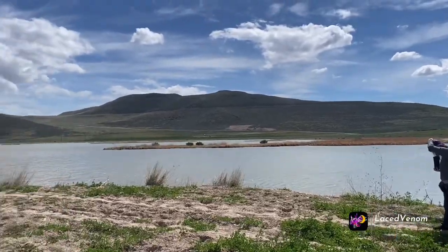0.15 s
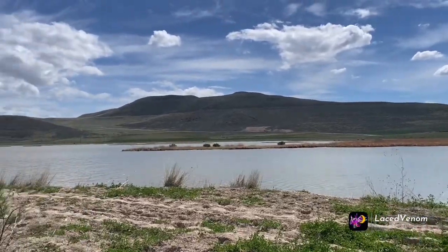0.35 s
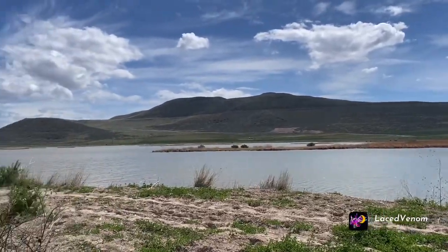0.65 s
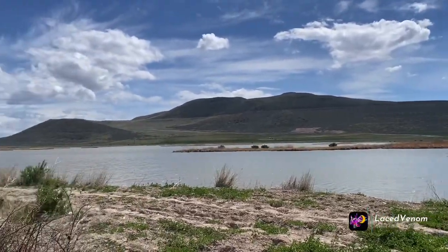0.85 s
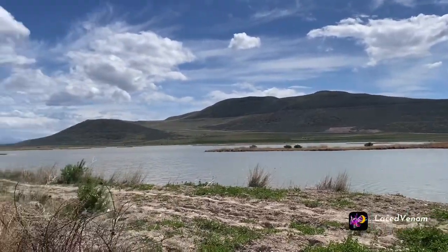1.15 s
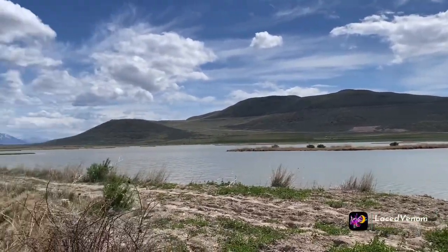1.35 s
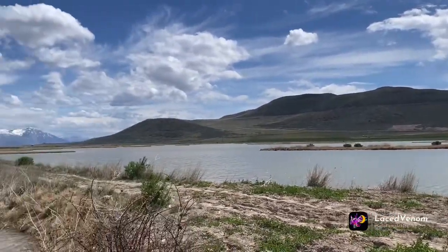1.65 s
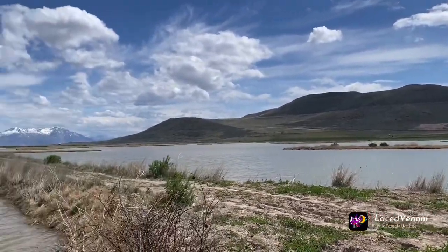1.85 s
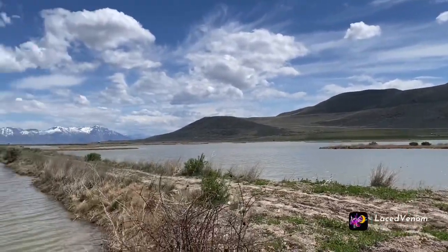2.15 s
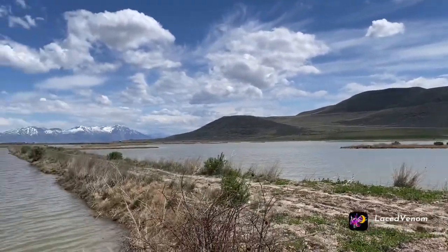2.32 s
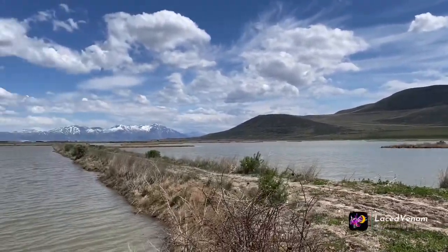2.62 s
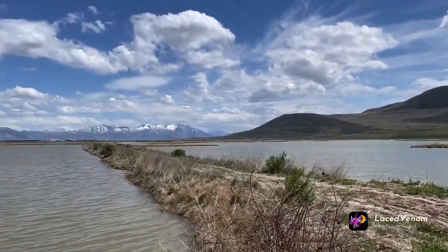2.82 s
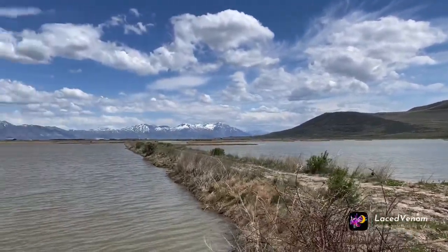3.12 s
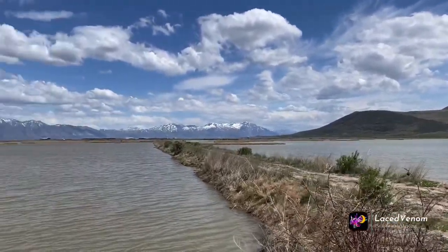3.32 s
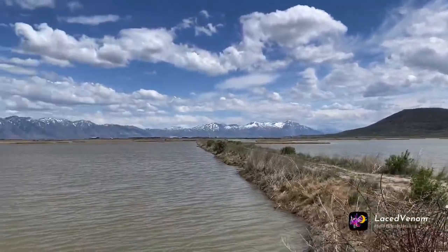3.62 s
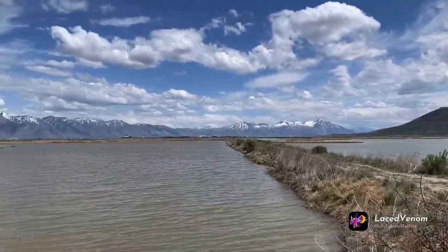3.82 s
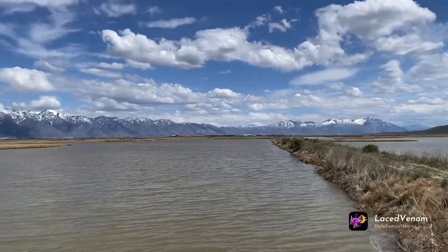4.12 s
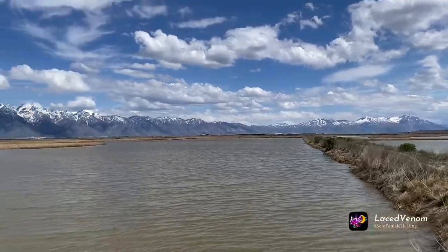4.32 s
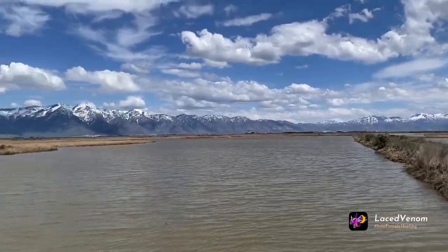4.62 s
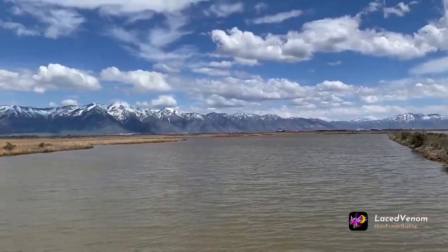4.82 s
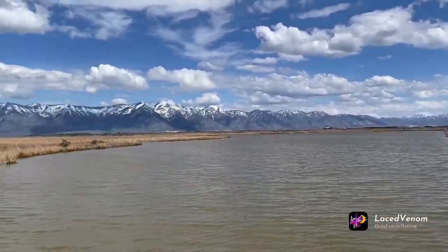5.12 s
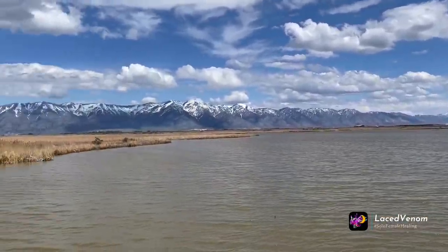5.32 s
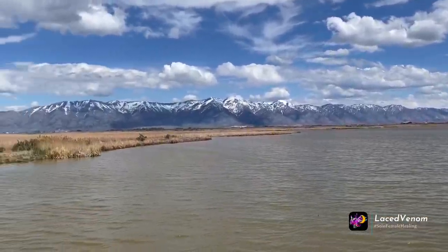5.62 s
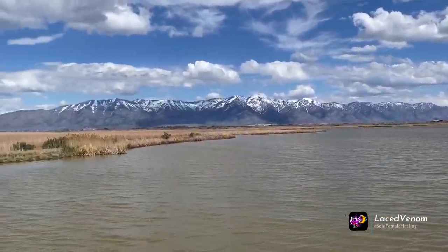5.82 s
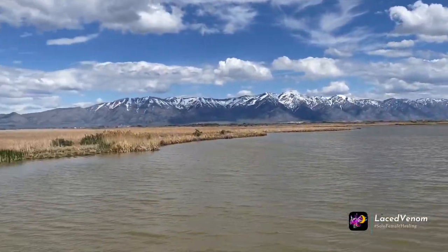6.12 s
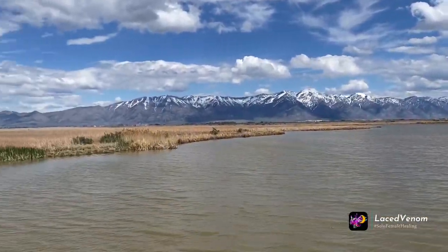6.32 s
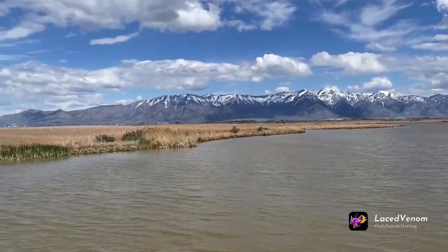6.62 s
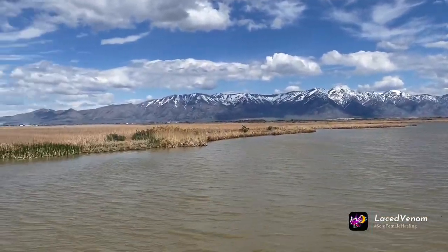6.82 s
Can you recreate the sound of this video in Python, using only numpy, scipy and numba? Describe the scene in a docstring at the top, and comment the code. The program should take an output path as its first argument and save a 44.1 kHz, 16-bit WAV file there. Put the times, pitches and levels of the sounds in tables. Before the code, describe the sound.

Outdoors by a lake, water runs steadily through a concrete box, a soft bubbly rush with gulps, bright plinks and tiny spray ticks, close and with a very short hard-walled echo. Deep wind thumps hit the hand-held microphone, light at first, strongest around one and a half and three seconds, then coming irregularly. Faint hiss lies underneath.

```python
"""Wind buffets a hand-held microphone, over water rushing through a concrete box by a lake.
Wind pushes the diaphragm with lumpy pressure swings: shaped noise, plus a single swing for each thump.
The flow is flickering noise with swarms of bubbles; trapped air rings as sines with short, swelling attacks.
Big bubbles gulp and rise in pitch, small ones plink near 2 kHz, and spray ticks on top;
the close walls answer these single splashes with a short tail of echoes. The microphone hisses faintly."""
import sys
import numpy as np
from scipy import signal
from scipy.fft import rfft, irfft, next_fast_len
from scipy.io import wavfile
from scipy.ndimage import uniform_filter1d
from numba import njit

SR = 44100
rng = np.random.default_rng(int(sys.argv[2]) if len(sys.argv) > 2 else 0)


def generate_wav(sig):
    """Save sig (samples, or channels by samples) to the path in sys.argv[1] as 16-bit PCM at SR."""
    pcm = np.round(np.clip(np.atleast_2d(sig).T, -1, 1) * 32767).astype(np.int16)
    wavfile.write(sys.argv[1], SR, pcm)


N = 306915


def from_db(db):
    """Decibels to gain."""
    return 10 ** (np.asarray(db) / 20)


def rms_one(x):
    """Scale to rms 1."""
    return x / np.sqrt(np.mean(x ** 2) + 1e-20)


def in_time(rows):
    """Draw straight lines through the columns of a curve table, one value a sample."""
    s, *columns = np.transpose(rows)
    return [np.interp(np.arange(N) / SR, s, column) for column in columns]


def drift(corner_hz):
    """Slow chance: coarse noise through two equal one-pole low-passes, run in; rms 1."""
    step = 40   # samples between coarse values
    pole = np.exp(-2 * np.pi * corner_hz * step / SR)
    noise = rng.standard_normal(N // step + 2002)
    slow = signal.lfilter([1], [1, -2 * pole, pole * pole], noise)[2000:]
    return np.interp(np.arange(N) / step, np.arange(len(slow)), rms_one(slow))


def coloured(spectrum, patchy_db, flicker_hz, count):
    """Noise of a given colour, cut into overlapping bands that each flicker on their own; rms 1."""
    size = next_fast_len(N)
    log_hz = np.log(np.arange(1, size // 2 + 2) * SR / size)
    hz, level_db = np.transpose(spectrum)
    corners = np.log(hz)
    colour_db = np.interp(log_hz, corners, level_db, left=-200, right=-200)
    shaped = rfft(rng.standard_normal(size)) * from_db(colour_db)
    place = (log_hz - corners[0]) / (corners[-1] - corners[0]) * (count - 1)
    total = np.zeros(N)
    for k in range(count):
        band = irfft(shaped * np.clip(1 - abs(place - k), 0, 1), size)[:N]
        total += band * from_db(patchy_db * drift(flicker_hz))
    return rms_one(total)


def swells(times, levels_db, half_s):
    """Short bell-shaped swells at the given times, as gain."""
    out, t = np.zeros(N), np.arange(N) / SR
    for s, db in zip(times, levels_db):
        near = slice(max(int((s - 3 * half_s) * SR), 0), int((s + 3 * half_s) * SR))
        out[near] += from_db(db) * np.exp(-((t[near] - s) / half_s) ** 2)
    return out


def evened(x, window_s):
    """Divide out most of the noise's own slow swells, so that the gusts lead the level."""
    width = int(window_s * SR)
    power = uniform_filter1d(uniform_filter1d(x ** 2, width), width)
    return rms_one(x / np.sqrt(power + 0.035))


def sucks(times, levels_db, hz):
    """A passing eddy pulls the diaphragm out once, with a small push before and after."""
    half_cycles = 0.6   # half length of the bell around the swing
    out, t = np.zeros(N), np.arange(N) / SR
    for s, db in zip(times, levels_db):
        near = slice(max(int((s - 2 / hz) * SR), 0), int((s + 2 / hz) * SR))
        turns = (t[near] - s) * hz
        out[near] -= from_db(db) * np.exp(-(turns / half_cycles) ** 2) * np.cos(2 * np.pi * turns)
    return out


def wind():
    """Pressure swings of eddies passing the microphone, from large slow ones down to small ones that rustle."""
    # Wind strength. Each row: time in seconds, large eddies in dB, small eddies in dB.
    gusts = [(0.0, -35.5, -37.5), (0.04, -35.5, -54.5), (0.29, -38, -54.5), (0.48, -34.5, -58),
             (1.01, -33.5, -48), (1.26, -31.5, -50.5), (1.57, -22.5, -45), (2.17, -27, -43.5),
             (2.21, -23, -40.5), (2.64, -28, -47.5), (2.79, -24.5, -42.5), (3.31, -29, -45),
             (4.55, -28, -42), (4.77, -40.5, -48), (5.0, -33.5, -49), (5.18, -30, -43.5), (5.64, -34, -46),
             (6.07, -36.5, -46), (6.24, -32.5, -52.5), (6.4, -28, -41.5), (6.55, -34, -47),
             (6.96, -32, -44)]
    # Single eddies that thump the diaphragm. Each row: centre in seconds, slow push peak in dB,
    # buffeting peak in dB, flutter swell in dB.
    thump_rows = [(0.226, -16.5, -47, -48), (0.349, -27.5, -54, -57), (.45, -22, -53, -40.5),
                  (1.048, -14.5, -41, -63), (1.421, -7, -29, -32), (1.589, -34, -21, -66),
                  (1.66, -11, -29, -42), (1.801, -35, -21, -29.5), (1.879, -24, -34, -36.5),
                  (1.98, -14.5, -20, -33), (2.07, -43, -43, -39), (2.255, -13, -9.5, -33),
                  (2.722, -10, -16.5, -57), (2.912, -19, -44, -61), (3.044, -17, -22, -39),
                  (3.152, -6.5, -36, -44), (3.2, -9, -37, -47), (3.278, -20, -12, -51),
                  (3.551, -26, -45, -37), (3.619, -14, -29, -63), (3.92, -11, -49, -53),
                  (4.36, -48, -18, -38), (4.587, -12.5, -26, -36), (5.12, -53, -43, -52),
                  (5.369, -35, -22.5, -39), (5.579, -37, -28, -47), (5.999, -18, -26, -47),
                  (6.38, -46, -38, -37.5), (6.53, -22, -46, -35), (6.888, -37, -22, -39)]
    # Colours of the eddies, largest first. Each row: frequency in Hz, relative level in dB per Hz.
    push_colour = [(1.2, -52), (2.0, 0), (24, -2.5), (31, -49), (53, -120)]
    buffet_colour = [(14, -58), (24, -2), (35, -9.5), (60, -17.5), (78, -59), (130, -120)]
    flutter_colour = [(35, -46), (60, -0.5), (130, -15), (170, -84), (290, -120)]
    rustle_colour = [(76, -30), (130, -0.5), (320, -10), (420, -20), (700, -120)]
    push_over_db, push_follows = 5, 0.62   # lift over the large eddies' mean; share of their swing
    flutter_lift_db, large_share = 1, 0.39   # lift over a blend of both strengths; the large eddies' share
    lumpy_db, lump_hz = -0.5, 2.6   # chance swells of each eddy size
    shared_db, shared_hz = 0.5, 24.5   # quick swells that all eddies share

    large_db, small_db = in_time(gusts)
    s, push_peak_db, buffet_peak_db, flutter_peak_db = np.transpose(thump_rows)
    mean_db = large_db.mean()
    slow_db = mean_db + push_over_db + push_follows * (large_db - mean_db)
    mid_db = flutter_lift_db + large_share * large_db + (1 - large_share) * small_db
    push_gain = from_db(slow_db + lumpy_db * drift(lump_hz))
    buffet_gain = from_db(large_db + lumpy_db * drift(lump_hz))
    flutter_gain = from_db(mid_db + lumpy_db * drift(lump_hz)) + swells(s, flutter_peak_db, half_s=0.019)

    thumps = sucks(s, push_peak_db, hz=14.4) + sucks(s, buffet_peak_db, hz=36.7)
    push = push_gain * evened(coloured(push_colour, 0, 1, count=2), window_s=0.12)
    buffet = buffet_gain * evened(coloured(buffet_colour, 0, 1, count=2), window_s=0.17)
    flutter = flutter_gain * evened(coloured(flutter_colour, 0.47, 44, count=2), window_s=0.35)
    rustle = from_db(small_db) * evened(coloured(rustle_colour, 0.43, 13.0, count=3), window_s=0.25)
    shared = from_db(shared_db * drift(shared_hz))
    return thumps + shared * (push + buffet + flutter + rustle)


@njit
def add(out, starts, peaks, pitches_hz, t60s, rise, attack_cycles, rate):
    """Each bubble is a sine that swells in, dies away and climbs by rise octaves a second."""
    for k in range(len(starts)):
        tone = np.zeros(int(.8 * t60s[k] * rate + 80))
        climb, fade = 2 ** (rise / rate), 1000 ** (-1 / (t60s[k] * rate))
        fill = np.exp(-pitches_hz[k] / (attack_cycles * rate))
        hz, left, empty, turns, top = pitches_hz[k], 1., 1., 0., 0.
        for i in range(len(tone)):
            shape = (1 - empty) ** 2 * left
            turns += min(hz / rate, .45)   # stay below half the sample rate
            tone[i], top = shape * np.sin(2 * np.pi * turns), max(top, shape)
            hz, left, empty = hz * climb, left * fade, empty * fill
        start = int(starts[k] * rate)
        out[start:start + len(tone)] += peaks[k] / top * tone[:len(out) - start]


def bubbles(s, peak_db, hz, t60, rise, attack_cycles):
    """A track holding one ringing bubble for each given time."""
    out, one = np.zeros(N), np.ones(len(s))
    add(out, s * one, from_db(peak_db) * one, hz * one, t60 * one, float(rise), float(attack_cycles), float(SR))
    return out


def swarm(per_s, low_hz, high_hz, cycles, spread_db, tilt_db, rise, clump_db, attack_cycles):
    """Countless unseen bubbles born in clumps, with uneven sizes and pitches; rms 1."""
    chance = per_s * from_db(clump_db * drift(9)) / SR   # of a birth at each sample
    born = np.flatnonzero(rng.random(N) < chance)
    size, place = rng.random((N, 2))[born].T
    hz = low_hz * (high_hz / low_hz) ** place
    peak_db = -spread_db * np.log(size + 0.022) + tilt_db * place
    return rms_one(bubbles(born / SR, peak_db, hz, cycles / hz, rise, attack_cycles))


def flow():
    """The steady rush through the box, with bubble swarms and fizzing spray, over the microphone's own hiss."""
    # Strength of the water, before each layer's trim. Each row: time in seconds, low rush in dB, churn in dB.
    water = [(0.0, -51, -50.5), (0.31, -52.5, -50.5), (0.81, -53, -49.5), (1.2, -55.5, -48.5),
             (1.61, -52, -53), (1.84, -54, -54), (2.29, -50.5, -61), (2.58, -54, -52), (3.18, -52.5, -54.5),
             (3.68, -53.5, -53), (4.03, -52, -48.5), (4.36, -52, -55), (4.55, -49.5, -47),
             (4.88, -54.5, -54), (5.21, -49.5, -52), (5.43, -52.5, -53), (5.7, -56, -50), (5.9, -50, -50),
             (6.15, -54.5, -52), (6.8, -52, -52.5), (6.96, -55, -50)]
    # Droplets thrown up, before trims. Each row: time in seconds, spray in dB, fine mist in dB.
    thrown = [(0.0, -64, -67.5), (0.31, -67, -75.5), (0.72, -64, -72.5), (1.61, -62.5, -74.5),
              (1.98, -64.5, -74.5), (2.5, -65.5, -73.5), (2.8, -62, -71), (3.2, -63.5, -70),
              (3.72, -61.5, -71.5), (4.59, -62, -67.5), (4.77, -62.5, -68.5), (5.85, -62, -68.5),
              (6.12, -62.5, -70.5), (6.96, -63, -72)]
    # Waves slapping the wall throw a spatter of spray, before trims.
    # Each row: centre in seconds, spray in dB, fine mist in dB.
    spatters = [(0.601,-63,-85),(1.38,-77,-71),(1.53,-71,-76),(2.22,-77,-70),(2.73,-62,-74),(3.64,-74,-79),(3.33,-85,-81),(3.839,-61,-67),(3.89,-68,-85),
                (4.07,-62,-63),(4.37,-59,-70),(4.53,-60,-75),(5.13,-63,-67),(5.61,-77,-67),(5.77,-79,-68),(5.99,-76,-79),(6.46,-61,-75),(6.84,-66,-71)]
    # Colours of the water, spray, mist and microphone hiss.
    # Each row: frequency in Hz, relative level in dB per Hz.
    rush_colour = [(150, -2.5), (250, -8), (395, -3.5), (549, -1.5), (907, -8), (1240, -12.5),
                   (1570, -12.5), (1990, -9), (3400, -27.5), (4420, -34), (7480, -120)]
    spray_colour = [(2200, -14), (3200, 0.5), (4000, 1), (5000, -1), (6300, -12.5), (7500, -33),
                    (9000, -47)]
    mist_colour = [(5500, -30), (7000, 3.5), (8000, 4.5), (10000, -1), (13000, -17), (16500, -13)]
    mic_colour = [(8000, -3.5), (11000, -10), (14000, -5), (17000, -5)]
    mic_hiss_db, spatter_s = -86, 0.014   # steady rms level; half length of a spatter

    rush_db, churn_db = in_time(water)
    spray_db, mist_db = in_time(thrown)
    s, spatter_db, spatter_mist_db = np.transpose(spatters)
    spray_gain = from_db(spray_db) + swells(s, spatter_db, spatter_s)
    mist_gain = from_db(mist_db) + swells(s, spatter_mist_db, spatter_s)
    surge = from_db(1.8 * drift(40))   # churn and spray swell together

    rush = from_db(rush_db + 0.56) * coloured(rush_colour, 3.2, 10.7, count=8)
    gurgle = from_db(rush_db - 2.5) * swarm(
        160, 328.4, 1158, cycles=24.0, spread_db=1.5, tilt_db=-3.0, rise=15.35, clump_db=6.0, attack_cycles=6.6)
    churn = surge * from_db(churn_db - 4.5) * swarm(
        900, 1068, 2913, cycles=16, spread_db=3.5, tilt_db=-1.5, rise=10.0, clump_db=2.5, attack_cycles=1.4)
    hiss = surge * spray_gain * from_db(-3.0) * coloured(spray_colour, 2.4, 49, count=5)
    mist = surge * mist_gain * from_db(-4.0) * coloured(mist_colour, 3.1, 34, count=4)
    spit = surge * mist_gain * from_db(-2.5) * swarm(
        1000, 5500, 14300, cycles=28, spread_db=5.5, tilt_db=-10, rise=0, clump_db=3.5, attack_cycles=2.5)
    fizz = surge * spray_gain * from_db(-3.0) * swarm(
        800, 2692, 7070, cycles=25, spread_db=6.0, tilt_db=-9.0, rise=0, clump_db=5.5, attack_cycles=2.0)
    mic_hiss = from_db(mic_hiss_db) * coloured(mic_colour, .3, 5, count=2)
    return rush + gurgle + churn + hiss + fizz + mist + spit + mic_hiss


def gulp(length_s, start_hz, end_hz):
    """A big bubble: swells, climbs ever faster as it nears the surface, and is gone when it bursts."""
    bend, skew = 1.51, 0.53   # the climb quickens towards the end; the swell peaks early
    u = np.arange(int(length_s * SR)) / (length_s * SR)
    pitch_hz = start_hz * (end_hz / start_hz) ** (u ** bend)
    return np.sin(np.pi * u ** skew) * np.sin(2 * np.pi * np.cumsum(pitch_hz) / SR)


def splashes():
    """The bubbles and droplets that stand out one by one, each ringing at its own pitch."""
    # Big bubbles. Each row: start in seconds, peak in dB before the wobble, start in Hz, end in Hz,
    # length in seconds.
    gulp_rows = [(0.045, -39.5, 373, 430, 0.014),(0.099, -50.5, 500, 620, 0.026),
                 (0.179, -40, 478, 790, 0.017), (0.272, -50, 476, 900, 0.022),
                 (0.286, -41, 890, 1140, 0.016), (0.3, -46.5, 480, 680, 0.021),
                 (0.432, -44, 537, 620, 0.021), (0.459, -43.5, 895, 1100, 0.0089),
                 (.565, -47.5, 497, 600, 0.029), (0.721, -47, 560, 640, 0.024),
                 (0.769, -46, 874, 1100, 0.022), (1.088, -49, 550, 910, 0.037),
                 (1.231, -46, 634, 720, 0.012), (1.358, -46, 786, 1060, 0.024),
                 (1.413, -40, 555, 664, 0.027), (1.424, -42, 738, 1120, 0.036),
                 (1.447, -40.5, 524, 623, .014), (1.577, -38, 444, 504, 0.015),
                 (2.021, -44, 570, 690, 0.022), (2.159, -43.5, 444, 564, 0.031),
                 (2.359, -43, 378, 470, 0.032), (2.486, -44.5, 529, 550, 0.061),
                 (2.599, -42, 483, 604, 0.021), (3.15, -39, 424, 470, 0.016),
                 (3.192, -41.5, 384, 480, 0.021), (3.84, -35.5, 453, 500, 0.024),
                 (3.856, -38, 507, 640, 0.018), (3.941, -37, 444, 855, 0.04), (4.046, -40, 498, 580, 0.037),
                 (4.147, -44.5, 354, 450, 0.03), (4.554, -41, 242, 387, 0.038),
                 (4.981, -41.5, 420, 580, .03), (5.195, -44, 295, 420, 0.053),
                 (5.137, -57, 420, 500, 0.014), (5.586, -43, 496, 596, 0.021),
                 (5.655, -43, 388, 560, 0.037), (5.7, -44.5, 510, 560, 0.022),
                 (5.869, -43.5, 600, 800, 0.01), (5.909, -39.5, 502, 620, 0.025),
                 (5.956, -37, 480, 680, 0.014), (6.045, -41.5, 460, 520, 0.011),
                 (6.153, -43.5, 395, 690, 0.058), (6.282, -37.5, 426, 840, 0.031),
                 (6.37, -42, 392, 520, 0.016), (6.5, -38.5, 536, 620, 0.012)]
    # Small bubbles. Each row: start in seconds, peak in dB, starting pitch in Hz, 60 dB decay in ms.
    plink_rows = [(0.0828,-31.5,1610,6.6),(0.209,-34.5,2650,3.5),(0.2724,-33,1890,8.1),(.297,-30,1880,3.5),(0.5771,-27,2000,2.4),(0.611,-33,1630,5),
                  (.63,-26,1620,3.4),(0.6366,-39,1770,30),(0.6535,-32.5,1890,22),(0.6812,-36,1930,9),(0.7426,-36,1600,10),(.7582,-31,1670,3.9),
                  (.802,-31,1800,17),(0.8865,-35,1720,7),(0.896,-24,1700,6.7),(0.9097,-38,1570,42),(0.939,-32,1580,11),(0.9716,-33,1830,9.4),
                  (0.977,-35,1630,18),(0.983,-36,1600,7.5),(1.001,-32,1940,9.1),(1.0148,-35,1370,2.7),(1.2022,-34,1940,8),
                  (1.29,-41,1900,6.2),(1.306,-38,1950,5),(1.316,-39,2360,6),(1.398,-34.5,1690,3.9),(1.4573,-27.5,1760,4.1),(1.501,-27,1820,4.9),(1.5002,-27,1360,5.6),(1.5163,-34,1620,7),(1.5246,-25.5,1560,6.4),(1.543,-35,1440,7),(1.597,-34,1590,6.9),
                  (1.617,-36,1790,9.6),(1.6371,-26.5,1790,7.5),(1.644,-38,1860,8.6),(1.668,-32,1800,2.3),(1.684,-35,1430,4.4),(1.6946,-35,1800,7.5),
                  (1.727,-30.5,1880,13),(1.7953,-39.5,1810,10),(1.8216,-32.5,1810,2.4),(2.0664,-27.5,1780,1.3),(2.1348,-29.5,1880,11),(2.1425,-40,1870,6),(2.1523,-38,1880,15),
                  (2.186,-31.5,1570,13),(2.1907,-28.5,1670,11),(2.2077,-36.5,1330,12),(2.2314,-38.5,2270,8.2),(2.2381,-34,1560,9.3),(2.265,-29,1630,11),
                  (2.328,-35.5,1860,22),(3.3743,-37,2370,7),(3.438,-28,1810,1.7),(3.4535,-24,2020,2.5),(3.466,-35,1590,4.3),(3.4815,-36,1850,6.3),
                  (3.503,-40,2100,7),(3.5294,-30.5,1970,5.3),(3.5453,-35.5,2230,6.4),(3.5767,-40,1760,6),(3.6453,-31.5,2030,9.8),(3.6452,-33.5,1310,6.8),(3.6643,-33,1920,9.3),(3.6713,-37,1290,8.9),(3.7084,-40,1340,8),(3.723,-28,2100,2.6),
                  (3.728,-39,1300,8.6),(3.766,-41,2100,5),(3.812,-37,2270,6),(3.8334,-37,2460,4.8),(3.86,-42,2300,5),(3.877,-46,2600,4),(3.927,-39,1910,21),(3.936,-34,1940,3.8),(3.999,-32,2400,2.3),(4.016,-33,1800,7.5),
                  (4.039,-32,1800,2.8),(4.07,-37,1190,4.9),(4.093,-33,1890,4),(4.1289,-31,1900,2.8),(4.1483,-39,2400,13),(4.332,-31.5,1830,2.1),
                  (4.35,-27,1990,4.1),(4.361,-27.5,2020,2.4),(4.37,-26.5,1750,1.3),(4.4432,-40,1410,14),(4.451,-39.5,2110,9.6),(4.4978,-39,1180,9.7),(4.5,-38,2220,8),(4.5263,-42,2900,5),(4.548,-38,1390,8),(4.566,-33,1500,2.6),(4.6155,-39,1510,8),(4.652,-42,1920,6.3),(4.6682,-39,1810,5.9),(4.6988,-32,2160,6.8),
                  (4.729,-30,2050,4.3),(4.777,-44,1340,9.4),(4.8189,-42,2050,6.6),(4.8305,-39,1990,7.6),(4.8463,-31,1810,3.5),(4.912,-37.5,1620,5),(5.079,-31,1230,2.7),(5.1087,-34,1260,2.9),(5.1557,-35.5,2040,9.6),(5.1782,-28,1930,7.7),
                  (5.198,-37,1270,5.5),(5.1985,-41,2100,5),(5.239,-37,1930,4.6),(5.262,-30,1290,3.6),(5.2827,-35.5,1290,15),(5.3023,-32,1510,1.9),(5.354,-39.5,2080,12),(5.41,-36,2160,7.7),
                  (5.4655,-35.5,2020,6),(5.5033,-31,1950,3.1),(5.5313,-40,1390,6),(5.562,-32,1850,9.3),(5.591,-35,1260,2.2),(5.596,-28,2130,5.6),(5.627,-43,2200,3.7),(5.643,-39,2310,8),(5.668,-43,2100,5),(5.719,-28,1450,2),
                  (5.727,-38,2100,6),(5.781,-40,2000,4),(5.79,-39,1400,8),(5.8025,-32,1760,4),(5.8265,-33,1450,4.4),(5.82,-40.5,2580,10),(5.849,-41,1500,4),(5.868,-37,1250,6.5),(5.88,-36,1790,7.2),(5.886,-41,1250,9),(5.9306,-39,1240,4),(5.9297,-38.5,2950,6),(5.9445,-39,1150,6),(5.947,-37,2280,8.5),(5.958,-42,1250,6),(5.98,-37.5,1360,11),
                  (6.011,-40,1910,5),(6.024,-40,1500,2.6),(6.024,-43,2700,4.6),(6.081,-39,2040,8.3),(6.085,-40,1470,7.8),(6.372,-32.5,2060,5.6),(6.402,-34,1940,3.8),(6.4214,-33.5,1470,5.6),(6.4336,-28,1920,3.1),
                  (6.4494,-33,1900,3.1),(6.46,-34,2330,7.4),(6.486,-28.5,2120,4.7),(6.55,-33,1970,6.8),(6.5985,-32,1520,3.9),(6.6148,-36,1970,6),(6.6402,-39,2010,6),(6.6737,-39,2070,6.5),
                  (6.783,-38.5,2000,11),(6.8214,-31.5,1346,5.2),(6.931,-37,1570,5.6)]
    # Droplets hitting the surface. Each row: start in seconds, peak in dB, pitch in Hz, 60 dB decay in ms,
    # snap peak in dB.
    tick_rows = [(.4698,-49,6800,3,-64),(0.5058,-41,2980,4,-62),(0.5772,-37,4800,7.3,-64),(0.615,-47,7600,3.5,-62),(.8014,-44.5,5000,6.8,-60),(.8962,-45,5030,3.7,-60),(0.984,-45,4890,4.2,-63),(.829,-51,5000,5,-62),(1.0001,-48,5200,4,-62),(1.0125,-48,4440,5,-62),(1.028,-39.5,4640,4.9,-57),
                 (1.1144,-59,12000,2,-66),(1.25,-42,3500,2.6,-57),(1.385,-38.5,4300,5.5,-58),(1.527,-45,5320,4.4,-54),(1.5479,-60,12500,2,-64),(1.7635,-37.5,3820,2.1,-66),(1.983,-45,4400,7,-62),
                 (2.0068,-50,6060,2.7,-50),(2.0664,-39,5400,4,-53),(2.1326,-55,14300,2.5,-52),(2.21,-41.5,5700,1.9,-54),(2.2188,-43,6070,2.5,-55),(2.4637,-49,4000,4.4,-64),(2.5232,-52,7500,4,-64),(2.5913,-38,2900,3.3,-65),(2.726,-36.5,6040,2.5,-60),(2.7252,-59,12000,2,-66),(2.861,-51,9800,3,-64),(2.933,-42,3830,3.9,-47),(2.9352,-55,13000,2.5,-66),
                 (2.965,-52,5600,5,-62),(3.0779,-58,7340,2.5,-63),(3.0779,-55,12500,1.5,-68),(3.1396,-42,9300,3,-44),(3.3243,-50,9300,5,-62),(3.4999,-57,8800,4,-62),(3.5302,-44,4970,5,-57),(3.545,-49,6000,3,-62),(3.57,-54,8700,4,-62),(3.6272,-48,6500,2.5,-56),(3.646,-37,5800,1.7,-41),(3.704,-41,4700,3.2,-46),(3.7531,-45,5160,2.4,-62),
                 (3.793,-40,3380,5.6,-56),(3.8277,-42,4760,6.6,-46),(3.8932,-34.5,5070,5.8,-56),(3.9957,-31.5,3280,1.1,-44),(4.078,-41,7240,2.1,-56),
                 (4.102,-40,4940,2.1,-54),(4.1465,-51,8400,2.5,-60),(4.2836,-43,3710,5,-56),(4.2911,-61,12000,2,-66),(4.3615,-43,5450,4.4,-53),(4.387,-36,5200,2.1,-49),(4.4702,-52,12000,2,-64),(4.5307,-26.5,7060,1.9,-43),
                 (4.554,-39,3910,2.4,-58),(4.586,-47,3260,4,-60),(4.638,-43,4670,6,-62),(4.6857,-44,2900,3.7,-60),(4.697,-52,7400,6,-62),(4.7226,-46,7070,2.5,-60),(4.9841,-48,7000,3,-60),(5.0677,-45,4500,1.8,-53),(5.0875,-38,3470,3,-59),(5.117,-37,2940,4,-60),(5.1203,-55,12500,2,-66),(5.124,-41,3600,2.6,-41),(5.1971,-46,7270,3,-50),(5.5326,-47,7480,3,-60),(5.6025,-47,5100,4,-60),
                 (5.6118,-24.5,3450,1.2,-36),(5.6675,-49,8690,3,-60),(5.679,-41,3920,2.8,-59),(5.7224,-53,8360,3,-60),(5.765,-42,4500,3.6,-53),(5.8066,-43,5000,1.8,-55),(5.9594,-43.5,3830,9.2,-60),
                 (5.9793,-48,6450,3,-60),(5.9947,-45,5130,1.7,-47),(6.013,-46,9000,2.7,-54),(6.073,-44,3680,4.8,-60),(6.1913,-52,12000,2,-64),(6.2771,-55,12000,2,-64),(6.54,-41,3470,3.4,-55),(6.623,-52,8440,3,-60),(6.4793,-38,3530,3.1,-47),(6.64,-42,4330,2,-53),(6.836,-43,4630,2.6,-60)]
    wobble_db, wobble_hz = 2, 95   # the churning water shakes the big bubbles' ring

    gulps = np.zeros(N)
    for s, peak_db, start_hz, end_hz, length_s in gulp_rows:
        tone = from_db(peak_db) * gulp(length_s, start_hz, end_hz)
        start = int(s * SR)
        gulps[start:start + len(tone)] += tone
    gulps = gulps * from_db(wobble_db * drift(wobble_hz))

    s, peak_db, hz, t60_ms = np.transpose(plink_rows)
    plinks = bubbles(s, peak_db, hz, t60_ms / 1000, rise=4.3, attack_cycles=0.72)
    s, peak_db, hz, t60_ms, snap_db = np.transpose(tick_rows)
    ticks = bubbles(s, peak_db, hz, t60_ms / 1000, rise=0, attack_cycles=0.51)
    snaps = bubbles(s, snap_db, 8170, 0.0016, rise=0, attack_cycles=1.2)   # the snap of the impact
    return gulps + plinks + ticks + snaps


def box(x, t60, level_db, dull_hz):
    """Echoes off the close concrete walls: a short, dull tail of scattered reflections."""
    t = np.arange(int(t60 * SR)) / SR
    tail = rng.standard_normal(len(t)) * from_db(-60 * t / t60)
    tail = tail * (t > .002)   # no echo in the first 2 ms
    tail = signal.sosfilt(signal.butter(1, dull_hz, fs=SR, output="sos"), tail)
    tail = tail / np.sqrt(np.sum(tail ** 2))
    return x + from_db(level_db) * signal.fftconvolve(x, tail)[:N]


def scene():
    """Wind, flow and splashes add up at one hand-held microphone; only the splashes get wall echoes."""
    echoing = box(splashes(), t60=0.031, level_db=-13.0, dull_hz=5000)
    return (wind() + flow() + echoing)[None]


def record(dry):
    """A brief fade in; a 1 Hz high-pass blocks steady pressure; a steep low-pass cuts the top."""
    fade_in_s, cutoff_hz = .01, 15800
    faded = dry * np.minimum(np.arange(N) / (fade_in_s * SR), 1)
    coupled = signal.sosfilt(signal.butter(1, 1, "high", fs=SR, output="sos"), faded)
    return signal.sosfilt(signal.ellip(10, .5, 70, cutoff_hz, fs=SR, output="sos"), coupled)


dry = scene()
out = record(dry)
generate_wav(out)
```